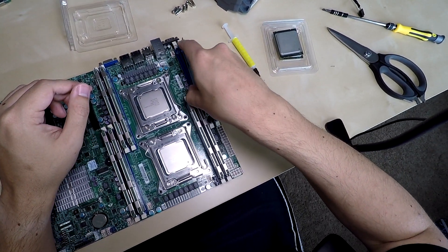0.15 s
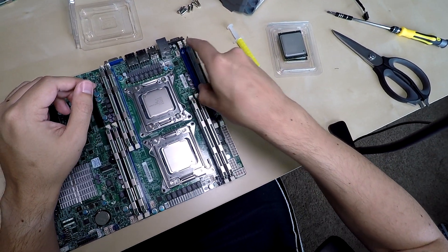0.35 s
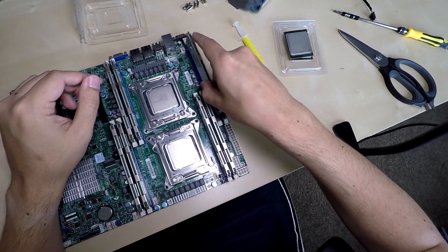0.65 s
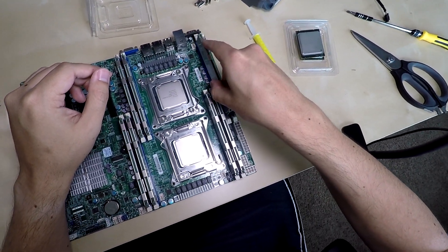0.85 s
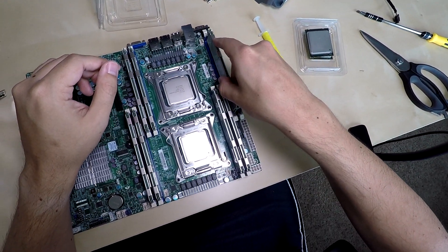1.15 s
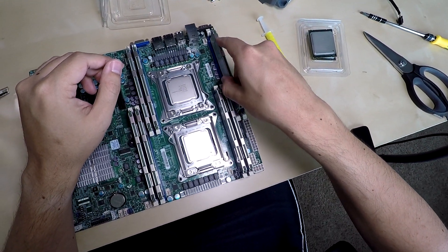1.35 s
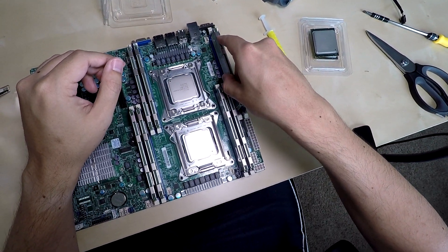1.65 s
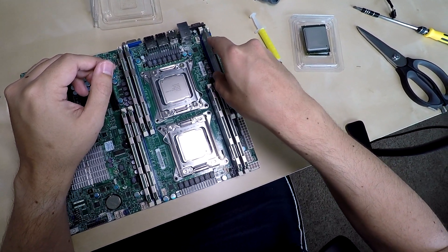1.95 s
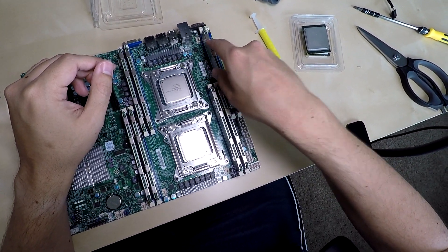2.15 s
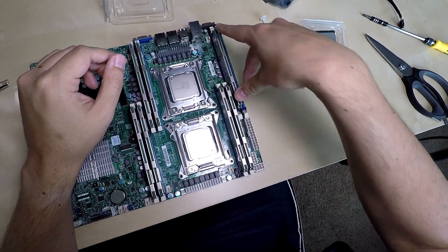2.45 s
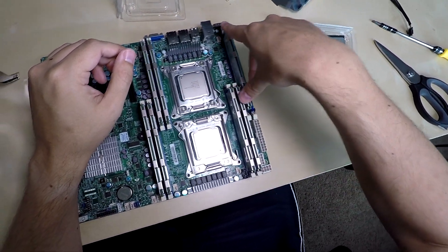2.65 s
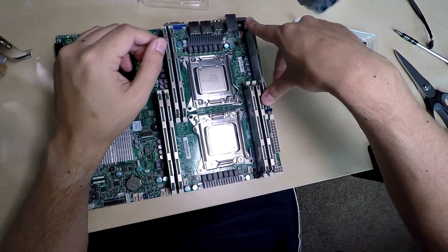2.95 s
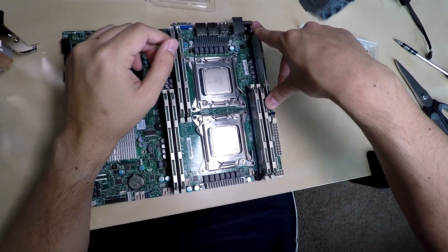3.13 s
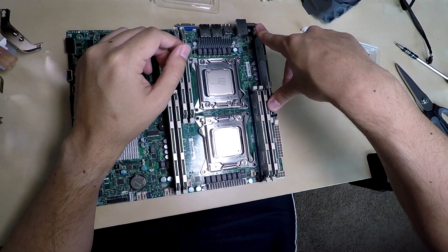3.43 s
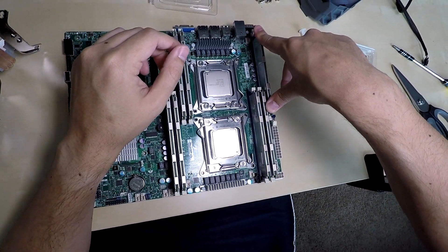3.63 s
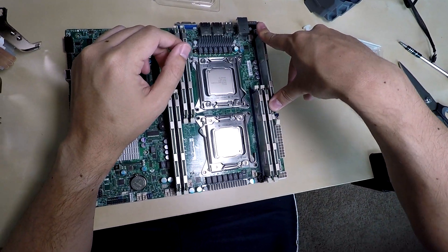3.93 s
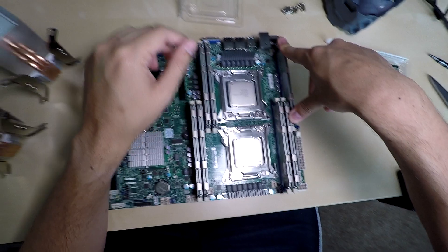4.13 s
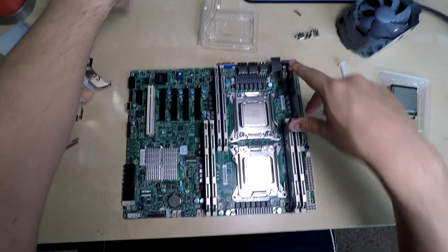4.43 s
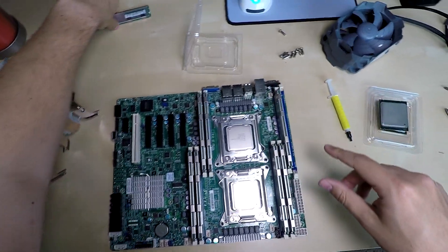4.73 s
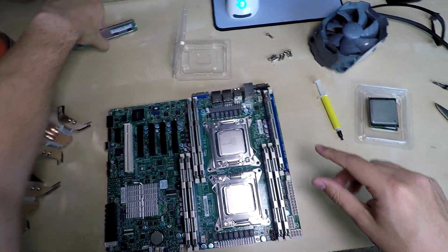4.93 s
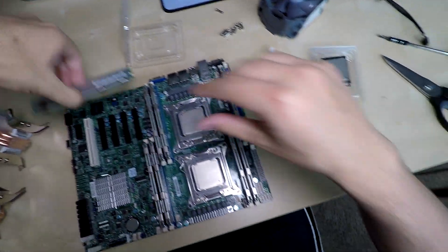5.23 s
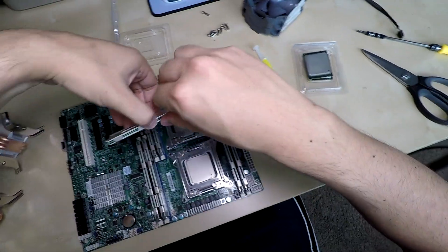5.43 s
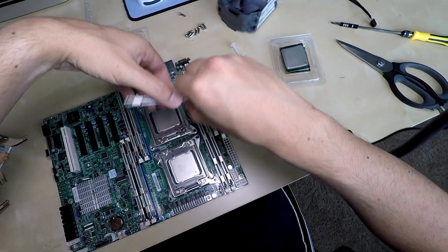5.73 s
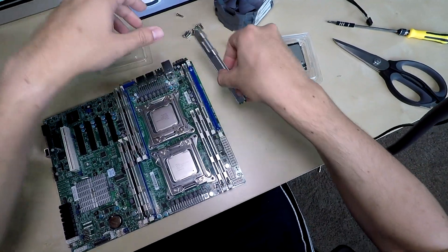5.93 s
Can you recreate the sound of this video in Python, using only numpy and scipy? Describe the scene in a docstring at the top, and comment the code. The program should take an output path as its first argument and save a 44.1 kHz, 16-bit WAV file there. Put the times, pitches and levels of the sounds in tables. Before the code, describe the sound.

A memory module is worked into a motherboard slot with a plastic knock and scrape, then scattered light taps and creaks. Past the middle, two latches snap shut sharply, one just after the other, each thumping the board against the desk. A second module is then dragged off the desk top in a few short, soft pulls. It is heard close up in a small room, with a low hum, rumble and faint hiss underneath.

```python
"""First you hear plastic knocks and scrapes: a memory module is worked into its slot on a motherboard
that lies on a desk in a small room. It rubs in the guides, then each end hits the bottom of the slot
and its latch snaps shut, thumping the board against the desk. A second module is dragged off the
desk top in a few short pulls. A low hum, rumble and faint hiss lie underneath, and a thin whine
joins them halfway through."""
import sys
import numpy as np
from scipy import signal
from scipy.fft import rfft, irfft
from scipy.io import wavfile

SR = 44100
rng = np.random.default_rng(int(sys.argv[2]) if len(sys.argv) > 2 else 0)


def wav_record(signal):
    """Record a signal, one row per channel, as 16-bit PCM in the file named by sys.argv[1]."""
    frames = np.transpose(np.atleast_2d(signal))
    bounded = np.clip(frames, -1, 1)
    # unit amplitude maps onto the largest positive 16-bit level
    quanta = np.round(bounded * 32767).astype(np.int16)
    wavfile.write(sys.argv[1], SR, quanta)


N = 268128
TIME = np.arange(N) / SR

# How the hum swells and fades. Each row: time in seconds, level in dB.
HUM_LEVELS = [(0.0, -47), (0.3, -42.5), (0.69, -44.5), (1.05, -43.5), (3.56, -49.5), (3.73, -48.5),
              (4.27, -55.5), (4.64, -46.5), (5.05, -58), (5.37, -44.5), (5.65, -55.5), (6.08, -45)]
# The tone of the room's hiss and of its rumble. Each row: frequency in Hz, relative level in dB.
AIR_TONE = [(40, -5.5), (100, 5.5), (150, 1), (210, -4.5), (290, -6), (430, -14.5), (750, -18), (1500, -23),
            (4000, -26), (8000, -31.5), (12000, -35), (15500, -38.5)]
RUMBLE_TONE = [(12, -7), (26, 11), (36, 1.5), (52, 1.5), (65, -12.5), (100, -22.5), (200, -69.5)]
# The module knocking. Each row: start in seconds, click level in dB, click treble cutoff in Hz,
# thud level in dB, thud centre in Hz, factor on the board's ring time (small when a hand damps it).
KNOCKS = [(0.0143, -24, 6070, -21.5, 690, 0.45), (.02, -27.5, 4000, -28, 219, 0.55),
          (.052, -39, 2490, -39, 700, 1.1), (.072, -48, 2000, -31, 240, 1.1),
          (.137, -45.5, 2000, -36.5, 430, 1.3), (0.2728, -28.5, 2460, -28, 535, 0.85),
          (0.3124, -45, 3200, -40, 520, 1), (0.3188, -42, 3000, -37, 760, .9),
          (.348, -48, 9000, -48, 650, 1), (0.3516, -42.5, 16000, -50, 650, 0.53),
          (.363, -63, 1500, -30.5, 313, 0.92), (0.386, -63, 1500, -49, 283, .8),
          (.836, -54, 16000, -38.5, 334, 0.75), (0.876, -66, 1500, -40, 350, 1.1),
          (1.374, -58, 2000, -41, 290, 0.56), (1.481, -57, 2000, -37, 340, 0.49),
          (1.5704, -56, 2000, -43, 650, .6), (1.581, -71, 2000, -35, 314, 0.56),
          (1.877, -48, 3500, -41, 930, 1.2), (1.879, -76, 2000, -32.5, 330, 0.62),
          (1.9895, -41, 4000, -40, 850, 1.1), (1.993, -66, 2000, -29.5, 340, 1.15),
          (2.0704, -32, 6950, -25, 394, 0.31), (2.104, -38, 3000, -34, 780, 1.1),
          (2.876, -62, 1200, -35.5, 830, 0.48), (2.959, -57, 1500, -46, 387, 0.68),
          (3.145, -51, 6000, -50, 600, 0.78), (3.558, -45, 1480, -31, 380, 0.65),
          (3.627, -62, 1500, -39.5, 328, 0.9), (3.881, -54.5, 1497, -28, 280, 0.85),
          (3.906, -40.5, 2500, -23.5, 406, 0.71), (4.39, -50, 14000, -46, 600, .6),
          (4.405, -61, 1503, -46, 330, 0.87), (4.921, -50.5, 4000, -47, 483, .7)]
# The module's resonances, the pitches it favours. Each row: pitch in Hz, width in Hz, gain in dB.
MODULE_RESONANCES = [(1310, 160, 0), (1730, 110, 1), (2045, 220, 2.5), (2353, 220, 2), (2917, 140, 1.5),
                     (3450, 320, 2), (4600, 500, -3.5), (5720, 600, -5.5), (6300, 900, -9), (7680, 500, -7),
                     (8500, 2000, -13), (11160, 1100, -12.5), (15000, 3000, -15.5)]
# Modes are the tones a struck thing rings with: here the motherboard, its bending as a whole, and
# the desk. Each row: pitch in Hz, relative level in dB, ring time (seconds to fade by 60 dB).
BOARD_MODES = [(207.3, -4.5, 0.09), (271, -6, 0.08), (316, -8.5, 0.08), (380.6, -6.5, 0.057),
               (419, -8, 0.089), (485, -11.5, 0.091), (576, -11, 0.049), (648, -9.5, 0.036),
               (735, -12, 0.065), (793, -15, .04), (940, -16, 0.034), (1172, -17, 0.016)]
BEND_MODES = [(143, -16.5, 0.2)]
DESK_MODES = [(42.6, -5, 0.59), (85.3, -7, 0.072), (127, -3.5, 0.14), (167.5, -8, 0.17), (203, -8, 0.31)]
# The board hitting the desk. Each row: start in seconds, strength in dB, centre pitch in Hz.
THUMPS = [(0.019, -31, 139), (.828, -36, 125), (1.876, -34, 128), (1.9934, -32.5, 126), (2.074, -31, 122),
          (3.51, -30, 45), (3.519, -24.5, 118), (3.56, -33, 75), (3.571, -35.5, 135), (3.626, -44, 125),
          (3.879, -21, 67.4), (3.882, -24.5, 135), (3.8915, -27, 149), (3.904, -31, 185), (3.944, -38, 205)]
# Short scrapes, creaks and rustles as the modules and board are handled. Each row: start and length
# in seconds, levels of grit, creak and hiss in dB, creak centre in Hz, fade of grit and creak over
# the stroke in dB (below zero they grow).
SCRAPES = [(0.024, 0.063, -48, -43.5, -71, 800, 14), (0.293, 0.073, -55, -47.5, -62, 700, 5),
           (0.353, 0.0032, -70, -62, -52, 650, -2), (0.809, 0.05, -82, -50, -58, 332, 15),
           (1.39, 0.14, -82, -59, -85, 395, -2), (2.071, 0.033, -44, -40, -50, 750, -3),
           (3.507, 0.0045, -41.5, -51, -59, 700, -2), (3.533, 0.23, -68, -55, -83, 1300, 16),
           (3.788, 0.05, -59, -55.5, -77.5, 900, 1), (3.866, 0.051, -44, -42, -53, 800, -0.5),
           (6.031, 0.09, -68.5, -65, -81, 1100, -6)]
# The tone of a sliding edge's hiss. Each row: frequency in Hz, relative level in dB.
SLIDE_HISS_TONE = [(1500, -0.5), (4000, -2.5), (8500, -1.5), (15000, -6.5)]
# The module squeaking against a guide. Each row: start in seconds, length in seconds, level in dB.
SQUEAKS = [(1.456, 0.031, -62)]
# Latch cracks. Each row: start in seconds, strength in dB, length in ms, latch (0 far, 1 near).
SNAPS = [(3.5118, -8.5, 0.87, 0), (3.5131, -11.5, 0.78, 0), (3.5265, -19.5, 0.9, 0),
         (3.8979, -6.5, 0.71, 1), (3.9016, -28.5, 1.5, 1)]
# Latch resonances, one list per latch. Each row: pitch in Hz, width in Hz, gain in dB.
LATCH_RESONANCES = [
    [(1910, 2300, -14), (3860, 310, -3.5), (5363, 800, 1.5), (7740, 2200, -0.5), (10900, 2760, -4.5),
     (14500, 2300, -8)],
    [(2315, 1100, -7.5), (3850, 1200, 3), (5830, 790, -2), (7800, 1200, -9), (10700, 2235, -20),
     (14000, 2800, -18.5)],
]
# The slot's buzz after a snap, one list per latch. Each row: frequency in Hz, relative level in dB.
BUZZ_TONES = [
    [(300, -5), (750, 2.5), (1250, -1.5), (1700, -5), (4200, -6), (5500, 2), (8000, -4), (10000, -8),
     (15500, -5)],
    [(300, 2), (900, 6.5), (1300, 0.5), (2400, -1.5), (5000, -5), (9000, -1.5), (15500, -14)],
]
# Tones left ringing, one list per latch. Each row: pitch in Hz, level in dB relative to the snap's
# strength, ring time in seconds.
LATCH_MODES = [
    [(5400, -36, 0.37), (5830, -37.5, .3), (5814, -38.5, .32), (5920, -40, 0.22), (6323, -40, .26),
     (7268, -38, .25), (7473, -38, .25), (11585, -45, .2)],
    [(2377, -36, 0.158), (2400, -41, .14), (3097, -35.5, .1), (3460, -33, .13), (3490, -43, .11),
     (3886, -27.5, 0.093), (4601, -36.5, .16), (7850, -31, .11)],
]
# An end of the module hitting the bottom of the slot. Each row: start in seconds, click level in dB,
# click treble cutoff in Hz, thud level in dB, thud centre in Hz.
SEATINGS = [(3.515, -40, 696, -31.5, 1000), (3.899, -22, 2474, -26.5, 520)]
# Pulls on the second module. Each row: start, length and swell time in seconds, judder level in dB,
# hiss level in dB, hollow pitch in Hz.
PULLS = [(4.599, 0.057, .008, -62, -61, 520), (4.667, 0.052, 0.016, -40, -55.5, 295),
         (4.722, 0.011, 0.0087, -42.5, -65, 335), (4.741, 0.042, 0.027, -40.5, -68, 438),
         (4.796, 0.023, .014, -45.5, -62.5, 565), (4.849, 0.037, 0.014, -54, -73, 525),
         (4.9, 0.028, 0.0082, -51.5, -76, 370)]
# Resonances of the sliding module and desk top. Each row: pitch in Hz, width in Hz, gain in dB.
SLIDE_RESONANCES = [(300, 100, -4.5), (447, 95, -0.5), (584, 90, -8.5), (820, 80, -14.5), (1025, 110, -14),
                    (1300, 83, -15.5), (1580, 80, -17), (2240, 88, -16), (3380, 190, -20),
                    (4140, 1040, -26.5)]
# Fingertips on the second module. Each row: start in seconds, length in seconds, level in dB.
BRUSHES = [(4.617, .05, -66), (4.73, .06, -71), (5.421, .025, -77.5), (5.614, 0.024, -71.5),
           (5.662, .022, -71), (5.724, 0.027, -73.5), (5.993, .025, -77)]
# How long the room echoes. Each row: frequency in Hz, ring time in seconds.
ROOM_RING_TIMES = [(100, 0.24), (500, 0.26), (750, 0.21), (2000, 0.39), (3500, 0.38), (7000, 0.3),
                   (14000, 0.22)]
# How strong the echoes are. Each row: frequency in Hz, gain in dB.
ROOM_GAINS = [(80, -3), (300, -2), (1000, -3.5), (2000, -9.5), (3500, -15), (7000, -9), (14000, -6.5)]


def from_db(db):
    """Turn decibels into a number to multiply by."""
    return 10 ** (np.asarray(db) / 20)


def rms_one(x):
    """Scale a sound so that its average level (rms) is 1."""
    return x / np.sqrt(np.mean(x ** 2) + 1e-20)


def level_over(x, length, db):
    """Give a sound the energy of that level held for that many seconds."""
    return x * from_db(db) * np.sqrt(length * SR / (np.sum(x ** 2) + 1e-20))


def at_hz(points, hz):
    """Read between the rows of a table, with every octave equally wide."""
    freqs, values = np.transpose(points)
    return np.interp(np.log(np.maximum(hz, 1)), np.log(freqs), values)


def add(out, s, sound):
    """Mix a sound in, starting at s seconds."""
    start = max(round(s * SR), 0)
    out[start:start + len(sound)] += sound[:N - start]


def noise(tone, size):
    """Noise of average level 1, shaped by rows of frequency in Hz and level in dB."""
    gains = from_db(at_hz(tone, np.fft.rfftfreq(size, 1 / SR)))
    return rms_one(irfft(rfft(rng.standard_normal(size)) * gains, size))


def low_pass(x, hz, order=2):
    """Take the treble off."""
    return signal.sosfilt(signal.butter(order, min(hz, .45 * SR), fs=SR, output="sos"), x)


def resonate(x, resonances):
    """Let a sound ring each resonance and add the results, every second one upside down."""
    out = 0
    for k, (hz, width, db) in enumerate(resonances):
        r = np.exp(-np.pi * width / SR)   # share of the ring left after one sample
        poles = [1, -2 * r * np.cos(2 * np.pi * hz / SR), r * r]
        ringing = (1 - r * r) / 2 * signal.lfilter([1, 0, -1], poles, x + 1e-18)
        out = out + (-1) ** k * from_db(db) * ringing
    return out


def strike(modes):
    """Fading sine waves; every blow shares its strength among them a little differently."""
    hz, db, ring_s = np.transpose(modes)[:, :, None]
    t = TIME[:SR // 3]
    signs = (-1) ** np.arange(len(modes))[:, None]
    strength = from_db(db + 2 * rng.standard_normal(db.shape))
    fade = from_db(-60 * t / ring_s)
    return np.sum(signs * strength * fade * np.sin(2 * np.pi * hz * t), axis=0)


def touched(modes, centre_hz, focus_db_per_octave, ring=1):
    """The spot that is hit favours modes near centre_hz; ring multiplies their ring times."""
    hz, db, ring_s = np.transpose(modes)
    weighted_db = db - focus_db_per_octave * np.abs(np.log2(hz / centre_hz))
    make_up_gain = np.linalg.norm(from_db(db)) / np.linalg.norm(from_db(weighted_db))
    return make_up_gain / np.sqrt(ring) * strike(np.transpose([hz, weighted_db, ring_s * ring]))


def detuned(modes, spread):
    """The grip and pressure of the fingers shift every pitch a little from touch to touch."""
    return [(hz * np.exp(spread * rng.uniform(-1, 1)), *rest) for hz, *rest in modes]


def chatter(length, count=7, bounce=0.628):
    """One sharp tap broken up into tiny rebounds over about that many seconds."""
    size = SR // 4
    hz, spectrum = np.fft.rfftfreq(size, 1 / SR), 1
    gaps = np.linspace(1, 4, count) * rng.uniform(.8, 1.2, count)
    for lag in np.ceil(gaps / gaps.sum() * length * SR):
        delay = np.exp(-2j * np.pi * hz * lag / SR)
        spectrum = spectrum * (delay - bounce) / (1 - bounce * delay)   # echoes that favour no pitch
    return irfft(spectrum, size)


def hum(pitch_hz=70.8, waver_hz=0.59, flutter_db=2.0):
    """A low machine hum that swells and fades slowly, and wavers in pitch and level."""
    slow_changes = [(1, 0), (3, -3), (8, -30), (30, -90)]
    pitch_drift, level_drift = noise(slow_changes, N), noise(slow_changes, N)
    phase = 2 * np.pi * np.cumsum(pitch_hz + waver_hz * pitch_drift) / SR
    level_db = np.interp(TIME, *np.transpose(HUM_LEVELS)) + flutter_db * level_drift
    return from_db(level_db) * np.sqrt(2) * np.sin(phase)


def room_noise(air_db=-54.5, rumble_db=-49.0):
    """The room's steady faint hiss and deep rumble."""
    return from_db(air_db) * noise(AIR_TONE, N) + from_db(rumble_db) * noise(RUMBLE_TONE, N)


def click(db, bright_hz, contact_s=0.0011, rattle_db=-3, rattle_s=0.01):
    """A brief chatter of plastic on plastic that rings the module."""
    t = TIME[:SR // 4]
    rattle = rng.standard_normal(len(t)) * np.exp(-t / rattle_s)
    contact = chatter(contact_s) + from_db(rattle_db) * rattle / np.linalg.norm(rattle)
    ringing = resonate(contact, detuned(MODULE_RESONANCES, spread=.015))
    return level_over(low_pass(ringing, bright_hz, order=1), contact_s, db)


def board(centre_hz, ring=1):
    """One ring of the motherboard, whose modes shift a little as it flexes."""
    return touched(detuned(BOARD_MODES, spread=0.043), centre_hz, focus_db_per_octave=8, ring=ring)


def thud(db, centre_hz, ring, settle_s=.0004):
    """A push that bends the whole board and rings it as it settles."""
    push = chatter(settle_s)
    ringing = board(centre_hz, ring) + strike(BEND_MODES)
    return from_db(db) * signal.fftconvolve(push, ringing)[:SR // 4]


def knocks(rebound_s=0.0038, rebound_db=-6.5):
    """The module clicks against its guides, the board gives, and the click bounces once."""
    out = np.zeros(N)
    for s, click_db, bright_hz, thud_db, centre_hz, ring in KNOCKS:
        add(out, s, click(click_db, bright_hz) + thud(thud_db, centre_hz, ring))
        add(out, s + rebound_s, click(click_db + rebound_db, bright_hz))
    return out


def thumps(cushion_hz=260):
    """The board is pushed down onto the desk, which booms."""
    out = np.zeros(N)
    for s, db, centre_hz in THUMPS:
        boom = touched(DESK_MODES, centre_hz, focus_db_per_octave=25)
        add(out, s, from_db(db) * low_pass(boom, cushion_hz))
    return out


def friction(length, slips_per_s, spread_db):
    """A stroke of tiny uneven slips, then silence in which the rubbed thing can ring."""
    t = TIME[:SR // 4]
    slips = (rng.random(len(t)) < slips_per_s / SR) * rng.choice([-1, 1], len(t))
    sizes = from_db(spread_db * rng.standard_normal(len(t)))
    stroke = np.sqrt(np.abs(np.sin(np.pi * np.minimum(t / length, 1))))
    return slips * sizes * stroke


def scrapes(bright_hz=4570):
    """Short scrapes, creaks and rustles as the modules and board are handled: tiny slips ring both."""
    out, hiss_level = np.zeros(N), np.zeros(N)
    for s, length, grit_db, creak_db, hiss_db, centre_hz, fade_db in SCRAPES:
        progress = np.minimum(TIME[:SR // 4] / length, 1)
        slips = friction(length, slips_per_s=3700, spread_db=6.0) * from_db(-fade_db * progress)
        grit = resonate(slips, detuned(MODULE_RESONANCES, spread=.02))
        creak = signal.fftconvolve(slips, board(centre_hz))
        add(out, s, level_over(low_pass(grit, bright_hz, order=1), length, grit_db))
        add(out, s, level_over(creak, length, creak_db))
        add(hiss_level, s, from_db(hiss_db) * np.sin(np.pi * progress))
    return out + hiss_level * noise(SLIDE_HISS_TONE, N)


def squeaks(pitch_hz=3740, width_hz=290):
    """A few quick slips against a guide ring one narrow resonance of the slot."""
    out = np.zeros(N)
    for s, length, db in SQUEAKS:
        slips = friction(length, slips_per_s=1500, spread_db=3)
        add(out, s, level_over(resonate(slips, [(pitch_hz, width_hz, 0)]), length, db))
    return out


def skid(start_s=2.0775, gap_s=.004, count=6):
    """The module sticks and slips down its guides in a quick run of ticks."""
    out = np.zeros(N)
    gaps = gap_s * rng.uniform(.8, 1.2, count)
    for s in start_s + np.cumsum(gaps) - gaps[0]:
        add(out, s, click(db=-40.5, bright_hz=7000) + thud(db=-32, centre_hz=664, ring=0.75))
    return out


def whine(start_s=3.08, pitch_hz=13360, width_hz=80, db=-84.5, fade_db_per_s=3):
    """A thin, very high whine that sets in halfway through and fades."""
    since = TIME - start_s
    level = (since > 0) * from_db(db - fade_db_per_s * since)
    return level * rms_one(resonate(rng.standard_normal(N), [(pitch_hz, width_hz, 0)]))


def snaps(crack_db=-2.5, buzz_db=-4, buzz_s=0.0084):
    """A latch snaps shut with a crack, then the slot buzzes briefly and a few tones ring on."""
    out, t = np.zeros(N), TIME[:SR // 4]
    for s, db, length_ms, latch in SNAPS:
        length = length_ms / 1000
        crack = resonate(chatter(length), LATCH_RESONANCES[latch])
        buzz = noise(BUZZ_TONES[latch], len(t)) * np.exp(-t / buzz_s)
        add(out, s, level_over(crack, length, db + crack_db))
        add(out, s + length, level_over(buzz, length, db + buzz_db))
        add(out, s, from_db(db) * strike(LATCH_MODES[latch]))
    return out


def springs(count=60, low_hz=5200, high_hz=8460, db=-46.5, ring_s=0.41):
    """The first snap leaves the slot's metal contact springs ringing, each at its own pitch."""
    out, t = np.zeros(N), TIME[:SR // 2]
    hz = rng.uniform(low_hz, high_hz, (count, 1))
    tones = rng.standard_normal((count, 1)) * np.sin(2 * np.pi * hz * t)
    add(out, SNAPS[0][0], rms_one(tones.sum(axis=0)) * from_db(db - 60 * t / ring_s))
    return out


def seatings(bounce_s=.0105, bounce_db=-4):
    """Each end of the module hits the bottom of the slot, jolts the board and bounces once."""
    out = np.zeros(N)
    for s, click_db, bright_hz, thud_db, centre_hz in SEATINGS:
        for start, change_db in (s, 0), (s + bounce_s, bounce_db):
            add(out, start, click(click_db + change_db, bright_hz))
            add(out, start, thud(thud_db + change_db, centre_hz, ring=.7))
    return out


def drags(slips_per_s=6000, sag_db_per_s=43, judder_fade_s=0.019, hiss_fade_s=.012,
          hollow_width_hz=70, hollow_db=6, lowest_hz=235):
    """The second module judders and hisses over the desk; its hollow pitch shifts with each grip."""
    out, hiss_level, t = np.zeros(N), np.zeros(N), TIME[:SR // 4]
    bass_cut = signal.butter(2, lowest_hz, "high", fs=SR, output="sos")   # too small to make bass
    for s, length, swell_s, judder_db, hiss_db, hollow_hz in PULLS:
        pull = np.minimum(t / swell_s, 1) * from_db(-sag_db_per_s * t)   # builds, then slackens
        since_stop = np.maximum(t - length, 0)
        slips = (rng.random((2, len(t))) < slips_per_s / SR) * rng.standard_normal((2, len(t)))
        edge, corner = slips * pull * np.exp(-since_stop / judder_fade_s)   # the desk top rings on
        hollow = resonate(corner, [(hollow_hz, hollow_width_hz, hollow_db)])
        judder = signal.sosfilt(bass_cut, resonate(edge, SLIDE_RESONANCES) + hollow)
        add(out, s, level_over(judder, length, judder_db))
        add(hiss_level, s, from_db(hiss_db) * pull * np.exp(-since_stop / hiss_fade_s))
    return out + hiss_level * noise(SLIDE_HISS_TONE, N)


def brushes(pitch_hz=13400, width_hz=2100):
    """Fingertips brush the second module as it changes hands."""
    out = np.zeros(N)
    for s, length, db in BRUSHES:
        slips = friction(length, slips_per_s=2000, spread_db=4)
        add(out, s, level_over(resonate(slips, [(pitch_hz, width_hz, 0)]), length, db))
    return out


def room_echoes(x, build_s=0.003):
    """Echoes build up within milliseconds, and each band of pitches dies away at its own speed."""
    t = TIME[:SR // 2]
    edges_hz = np.geomspace(60, 17000, 16)
    tail = 0
    for low, high in zip(edges_hz, edges_hz[1:]):
        hz = np.sqrt(low * high)
        band_pass = signal.butter(2, [low, high], "band", fs=SR, output="sos")
        band = signal.sosfilt(band_pass, rng.standard_normal(len(t)))
        band *= from_db(-60 * t / at_hz(ROOM_RING_TIMES, hz)) * (1 - np.exp(-t / build_s))
        band *= np.sqrt((high - low) / (SR / 2) / np.sum(band ** 2))   # wider bands get more energy
        tail = tail + from_db(at_hz(ROOM_GAINS, hz)) * band
    return signal.fftconvolve(x, tail)[:N]


def scene():
    """The handling sounds and their echoes, over hum, whine and room noise, in one channel."""
    handling = knocks() + skid() + seatings() + snaps() + thumps() + springs()
    handling += scrapes() + squeaks() + drags() + brushes()
    background = hum() + whine() + room_noise()
    return (handling + room_echoes(handling) + background)[None]


def record(dry, cutoff_hz=15700):
    """The very highest treble is cut off steeply."""
    return signal.sosfilt(signal.ellip(10, .1, 80, cutoff_hz, fs=SR, output="sos"), dry)


dry = scene()
out = record(dry)
wav_record(out)
```